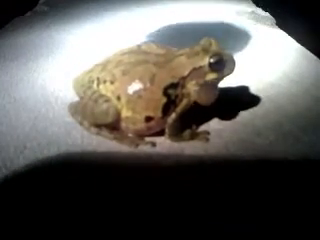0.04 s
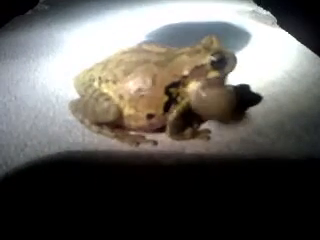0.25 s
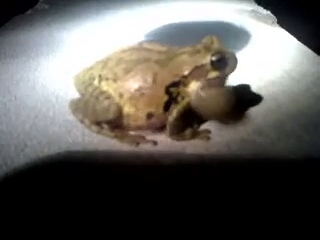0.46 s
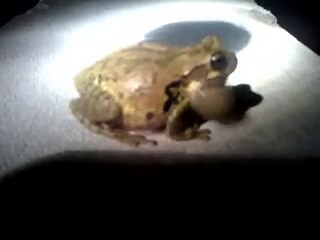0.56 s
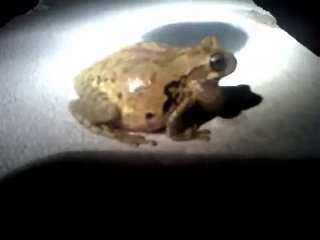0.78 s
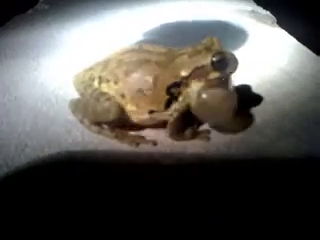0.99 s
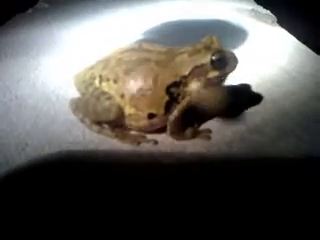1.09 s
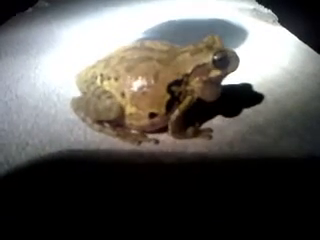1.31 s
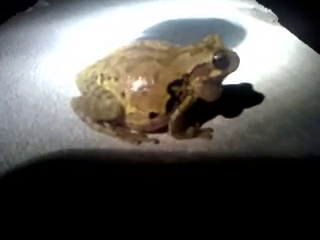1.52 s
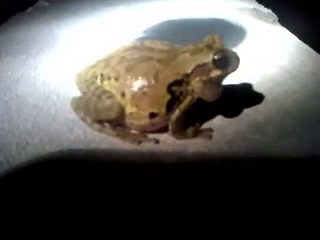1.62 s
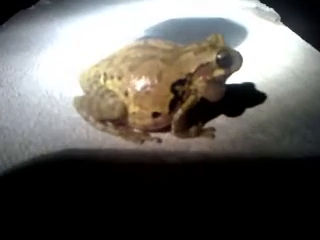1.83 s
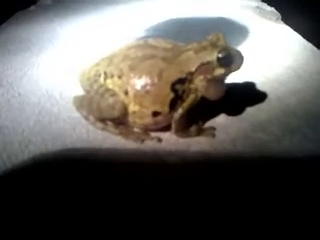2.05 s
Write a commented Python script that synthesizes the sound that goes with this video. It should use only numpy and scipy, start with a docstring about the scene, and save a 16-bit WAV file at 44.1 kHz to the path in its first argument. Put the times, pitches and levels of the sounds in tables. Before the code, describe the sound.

Outdoors at night, a nearby frog honks five times in about a second, each call nasal and rough-edged with a light echo. Afterwards there is only a quiet, dull background and three tiny far-off peeps.

```python
"""Tree frog at night

Outdoors, close to the microphone, a tree frog honks five times. Each honk is a train of larynx pulses
ringing the vocal sac and a bright upper resonance: it starts raspy, locks onto a clean pitch and breaks
up again. The surroundings echo it over a low hush with a few far peeps; the loudest peaks clip."""
import sys
import numpy as np
from scipy import signal
from scipy.fft import rfft, irfft, next_fast_len
from scipy.io import wavfile

SR = 44100
rng = np.random.default_rng(int(sys.argv[2]) if len(sys.argv) > 2 else 0)


def store_wav(level_fs):
    """Save 16-bit WAV to argv[1]."""
    pcm = np.round(np.clip(np.atleast_2d(level_fs), -1, 1) * 32767)
    wavfile.write(sys.argv[1], SR, pcm.T.astype(np.int16))


N = 90404

# The close frog, one honk a row: (start [s], lock [s], break-up [s], end [s], pitch at lock [Hz],
# first upper resonance [Hz], second [Hz], sac overtone before a 4.5 dB cut [dB])
HONKS = [(0.193, .212, 0.2402, .288, 215.6, 2536, 2897, -1.5),
         (0.389, 0.412, .438, .480, 215.2, 2396, 2850, -8.5),
         (.577, 0.601, 0.6332, .684, 216.1, 2634, 2826, -3),
         (0.778, 0.805, .833, .880, 215, 2578, 2727, -5),
         (0.98, 1.003, 1.029, 1.086, 216.9, 2558, 2797, -2)]
# Loudness through each honk: (time [s], sac level [dB], upper ring level [dB])
HONK_SWELLS = [
    [(0.195, -27, -51), (0.209, -18.5, -25.5), (0.229, -9, -20), (0.247, -8, -14.5), (0.267, -29, -37),
     (0.277, -26, -33), (0.288, -44.5, -44.5)],
    [(0.388, -35, -50), (0.398, -16.5, -30), (0.43, -15.5, -15.5), (0.462, -13.5, -25.5), (0.472, -23, -43),
     (0.48, -52, -50.5)],
    [(0.577, -43, -57), (0.587, -18, -29), (0.603, -12, -22), (0.623, -8, -16.5), (0.635, -9, -15.5),
     (0.665, -20.5, -25.5), (0.684, -40.5, -40)],
    [(0.779, -24, -60.5), (0.783, -21, -31.5), (0.807, -16.5, -20), (0.825, -8, -20.5), (0.849, -12.5, -22),
     (0.861, -20, -28.5), (0.88, -49, -37)],
    [(0.979, -26.5, -47.5), (0.989, -17, -31), (1.005, -13, -17.5), (1.025, -9, -14.5),
     (1.051, -14.5, -21.5), (1.079, -34, -38.5), (1.086, -32.5, -41.5)],
]


def frog():
    """Five honks in a row, close to the microphone."""
    out = np.zeros(N)
    for row, swell in zip(HONKS, HONK_SWELLS):
        span = np.arange(int(row[0] * SR), int(row[3] * SR))
        out[span] += honk(span / SR, row, swell)
    return out


# Breathy rasp of the larynx, in the sac and in the upper ring: (frequency [Hz], relative level [dB])
SAC_RASP = [(30, -29), (100, -16.5), (200, -8.5), (400, -4.5), (620, 5), (900, -3.5), (1100, -8),
            (1500, -19.5), (2000, -16.5), (3000, -37.5), (4200, -68)]
RING_RASP = [(800, -35.5), (1700, -6), (2000, -0.5), (2600, -0.5), (3050, -1), (3400, -11), (3800, -24),
             (4300, -32.5), (4800, -72)]


def honk(t, row, swell):
    """Larynx pulses and rasp sound the sac and the upper ring; the pitch scoops up, locks and sags."""
    _, lock, split, _, pitch_hz, first_hz, second_hz, overtone_db = row
    scoop_hz_per_s, sag_hz_per_s, break_sag_hz_per_s = 480, 86.64, 247.7
    settle_s, break_s, fade_s = 0.0053, 0.0113, 0.00495
    pitch = (pitch_hz - scoop_hz_per_s * np.maximum(lock - t, 0)
             - sag_hz_per_s * np.maximum(t - lock, 0)
             - break_sag_hz_per_s * np.maximum(t - split, 0))
    cycles = np.cumsum(pitch) / SR
    rough = np.clip(np.maximum((lock - t) / settle_s, (t - split) / break_s), 0, 1)  # 0 while locked
    pulses = larynx(t, cycles, rough)
    breath = rng.standard_normal((2, SR // 4))[:, :len(t)]
    puffs = (1 + 0.56 * np.cos(2 * np.pi * cycles)) * breath
    sac = vocal_sac(pulses, overtone_db)
    sac = blend(sac, coloured(puffs[0], SAC_RASP), share=0.0065 + 0.1578 * rough)
    ring = upper_ring(pulses, first_hz, second_hz)
    ring = blend(ring, coloured(puffs[1], RING_RASP), share=0.013 + 0.6 * rough)
    times, sac_db, ring_db = np.transpose(swell)
    edges = np.sin(np.pi / 2 * np.clip(np.minimum(t - t[0], t[-1] - t) / fade_s, 0, 1)) ** 2
    return edges * (amp(np.interp(t, times, sac_db)) * sac + amp(np.interp(t, times, ring_db)) * ring)


def larynx(t, cycles, rough):
    """One pulse per cycle; roughness scatters their times and sizes."""
    clean_jitter_s, rough_jitter_s, scatter_db = 0.000008, 0.0001098, 10
    times = np.interp(np.arange(int(cycles[-1]) + 1), cycles, t)
    loose = np.interp(times, t, rough)
    timing, size = rng.standard_normal((64, 2))[:len(times)].T
    times = times + timing * (clean_jitter_s + rough_jitter_s * loose)
    offset = (t - times[:, None]) * SR
    clicks = np.sinc(offset) * np.exp(-(offset / 6) ** 2)
    return amp(scatter_db * loose * size) @ clicks


# Broad radiation of the frog's body beside the resonances: (frequency [Hz], relative level [dB])
BODY_RADIATION = [(40, -45), (130, -30.5), (215, -24.5), (430, -30), (700, -26.5), (1070, -23), (1290, -22),
                  (1500, -27.5), (1900, -27), (2400, -39), (3500, -64.5)]


def vocal_sac(pulses, overtone_db, lag_s=0.0016):
    """The sac rings at its main resonance and one overtone, just behind the upper ring."""
    def response(hz):
        main = resonance(hz, centre_hz=629.82, width_hz=57)
        overtone = amp(overtone_db - 4.5) * resonance(hz, centre_hz=848.96, width_hz=84.4)
        modes = (main - overtone) / (1 + (hz / 1800) ** 8)  # treble rolled off
        return np.exp(-2j * np.pi * hz * lag_s) * (colour(BODY_RADIATION, hz) + modes)
    return filtered(pulses, response)


# Tone colour around the upper resonances: (frequency [Hz], relative level [dB])
RING_COLOUR = [(300, -47.5), (1300, -26), (1900, -2.5), (2300, -2), (2800, -4.5), (3020, 1), (3300, 7),
               (3700, -17), (4200, -24.5), (4800, -66)]


def upper_ring(pulses, first_hz, second_hz, width_hz=164.5):
    """Two neighbouring resonances of opposite sign give the honk its bright edge."""
    def response(hz):
        pair = resonance(hz, first_hz, width_hz) - amp(-4) * resonance(hz, second_hz, width_hz)
        return colour(RING_COLOUR, hz) * pair
    return filtered(pulses, response)


# Distinct echoes back at the microphone: (delay [s], level before colouring [dB])
ECHOES = [(.068, -25), (.105, -35)]
# Colour of all that the surroundings send back: (frequency [Hz], gain [dB])
ECHO_COLOUR = [(200, -15.5), (640, -13.5), (1500, -8), (2400, -2.5), (3000, 1), (4000, 5), (5000, -49)]


def surroundings(calls):
    """Two slightly smeared echoes and a thin diffuse tail, mostly treble."""
    smear_s, tail_t60_s, tail_rise_s = 0.018, 0.72, 0.049
    t = np.arange(SR) / SR
    tail = rng.standard_normal(SR) * amp(-60 * t / tail_t60_s) * (1 - np.exp(-t / tail_rise_s))
    answer = amp(-29.5) * tail / np.linalg.norm(tail)
    for delay, db in ECHOES:
        burst = rng.standard_normal(SR) * (t >= delay) * amp(-60 * np.abs(t - delay) / smear_s)
        answer += amp(db) * burst / np.linalg.norm(burst)
    return coloured(signal.fftconvolve(calls, answer)[:N], ECHO_COLOUR)


# Peeps far from the microphone: (time [s], pitch [Hz], level before a 5 dB lift [dB], length [s])
FAR_PEEPS = [(1.469, 921.6, -46.5, 0.0353), (1.623, 1329, -50.5, 0.0231), (1.89, 832.4, -48, 0.028)]


def peeps(rise_hz_per_s=2214):
    """Short rising notes from far away."""
    t, out = np.arange(N) / SR, np.zeros(N)
    for start, hz, db, length in FAR_PEEPS:
        progress = np.clip((t - start) / length, 0, 1)
        cycles = np.cumsum(hz + rise_hz_per_s * length * (progress - 0.4)) / SR
        out += amp(db + 5) * np.sin(np.pi * progress ** 1.076) * np.sin(2 * np.pi * cycles)
    return out


# Night ambience all around the microphone: (frequency [Hz], relative level [dB])
HUSH_SPECTRUM = [(15, -51), (25, -24), (86, -15.5), (122, -3.5), (206, -11.5), (234, 3.5), (311, -6),
                 (347, -4.5), (774, -10), (921, -10.5), (1200, -14), (1330, -17.5), (1890, -23.5),
                 (3390, -29.5), (4500, -58), (5850, -77.5), (9900, -120)]


def night_hush(level_db=-52.5, growth_db_per_s=0.5):
    """A low, dull hush that grows very slightly."""
    noise = unit(coloured(rng.standard_normal(N + SR // 4), HUSH_SPECTRUM)[-N:])
    return noise * amp(level_db + growth_db_per_s * np.arange(N) / SR)


def amp(db):
    """Decibels to gain."""
    return 10 ** (np.asarray(db) / 20)


def unit(x):
    """Scale to rms 1."""
    return x / np.sqrt(np.mean(x ** 2) + 1e-20)


def even(x, size=620):
    """Hold the short-term rms at 1."""
    window = np.hanning(size)
    power = np.convolve(x ** 2, window / window.sum(), "same")
    return x / np.sqrt(power + 1e-3 * np.mean(x ** 2) + 1e-20)


def blend(tone, noise, share):
    """Mix at an even level; share is the noise's part of the power."""
    share = np.clip(share, 0, 1)
    return even(np.sqrt(1 - share) * even(tone) + np.sqrt(share) * even(noise))


def colour(points, hz):
    """Causal response through (Hz, dB) points on a log axis."""
    f, db = np.transpose(points)
    cepstrum = irfft(np.log(amp(np.interp(np.log(hz + 1), np.log(f + 1), db))))
    half = len(cepstrum) // 2
    cepstrum[1:half] *= 2
    cepstrum[half + 1:] = 0
    return np.exp(rfft(cepstrum))


def resonance(hz, centre_hz, width_hz):
    """Response of one resonance."""
    return 1j * hz * width_hz / (centre_hz ** 2 - hz ** 2 + 1j * hz * width_hz)


def filtered(x, response):
    """x through a complex response of frequency."""
    size = 2 * next_fast_len(len(x))
    return irfft(rfft(x, size) * response(np.fft.rfftfreq(size, 1 / SR)), size)[:len(x)]


def coloured(x, points):
    """x through a spectrum of (Hz, dB) points."""
    return filtered(x, lambda hz: colour(points, hz))


def scene():
    """The close frog, its echoes, the far peeps and the night around them."""
    calls = frog()
    return (calls + surroundings(calls) + peeps() + night_hush())[None]


def record(dry):
    """A narrow-band microphone whose highest peaks clip, then the band limit."""
    microphone_top_hz, clip_level, band_limit_hz = 4200, 0.7275, 15750
    heard = filtered(dry[0], lambda hz: 1 / np.sqrt(1 + (hz / microphone_top_hz) ** 40))
    clipped = np.clip(heard, -clip_level, clip_level)
    return filtered(clipped, lambda hz: hz < band_limit_hz)[None]


dry = scene()
out = record(dry)
store_wav(out)
```